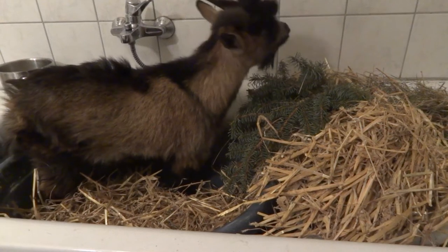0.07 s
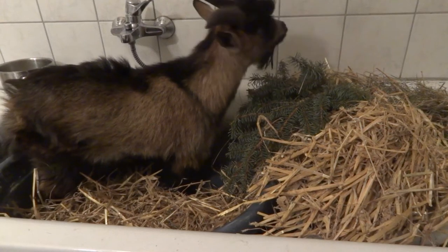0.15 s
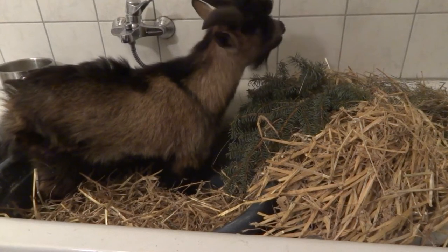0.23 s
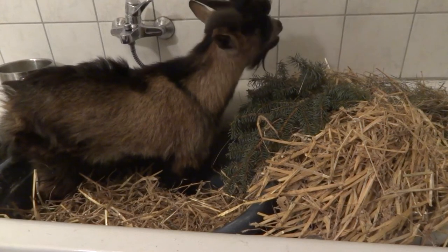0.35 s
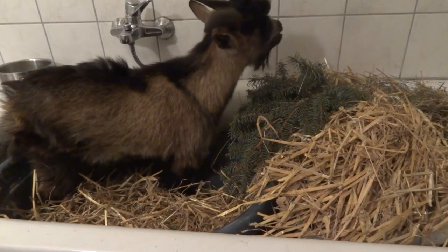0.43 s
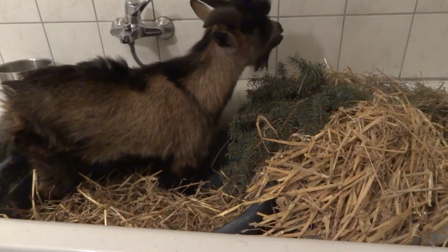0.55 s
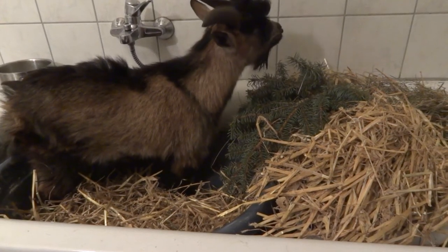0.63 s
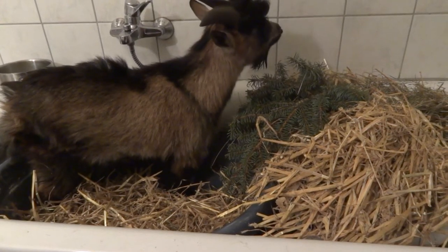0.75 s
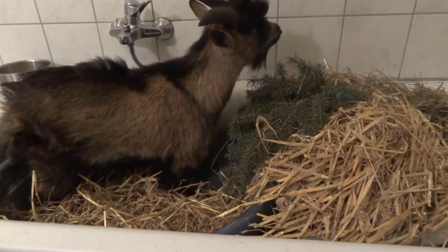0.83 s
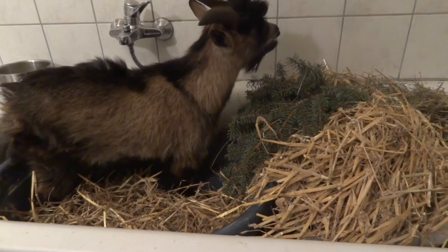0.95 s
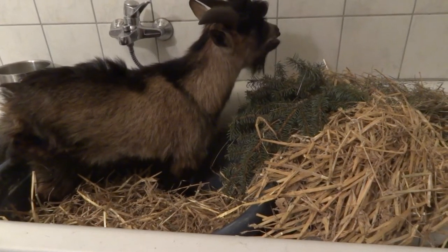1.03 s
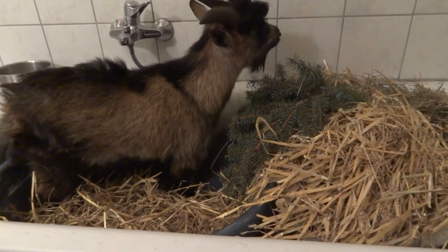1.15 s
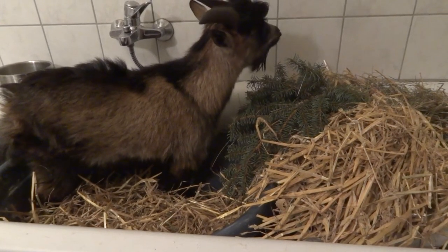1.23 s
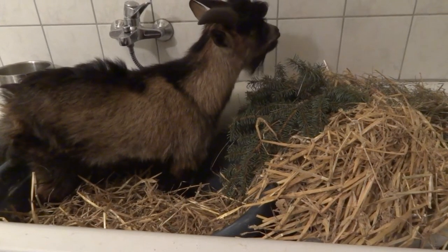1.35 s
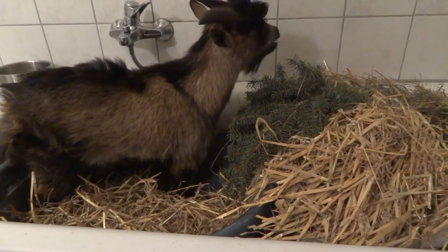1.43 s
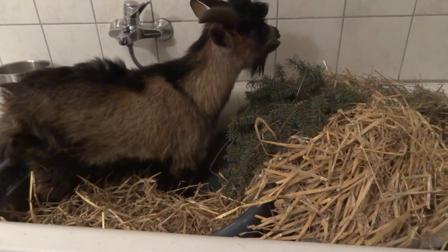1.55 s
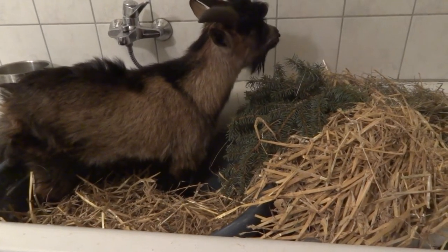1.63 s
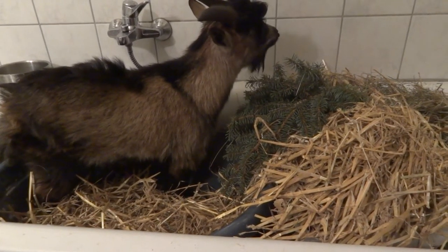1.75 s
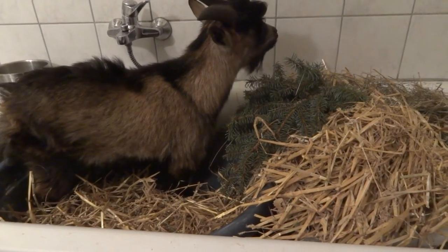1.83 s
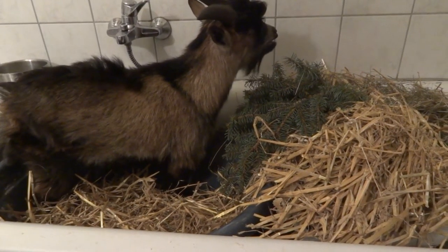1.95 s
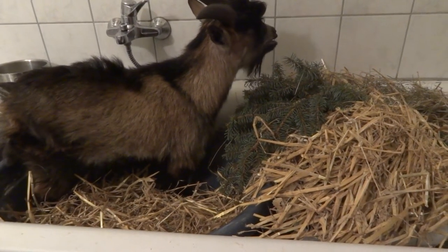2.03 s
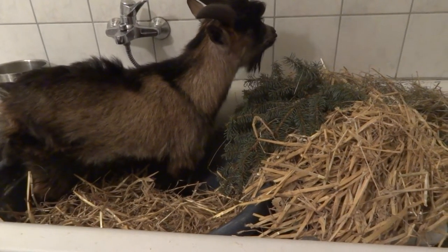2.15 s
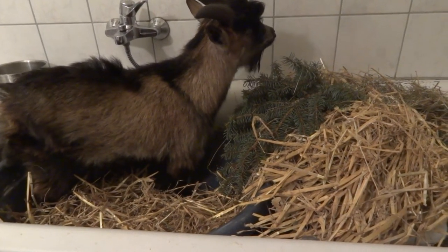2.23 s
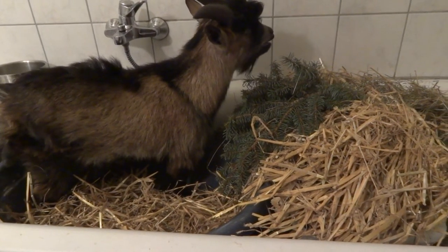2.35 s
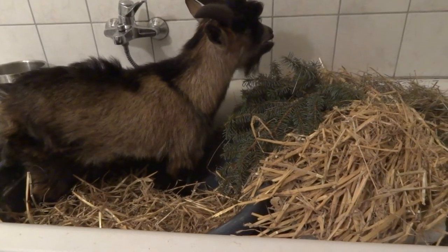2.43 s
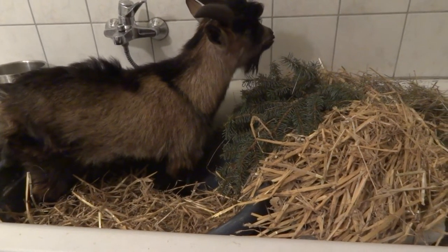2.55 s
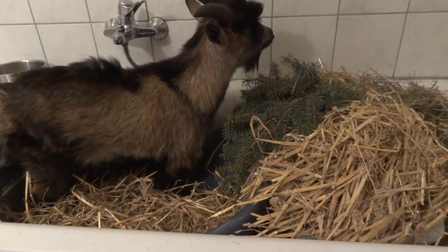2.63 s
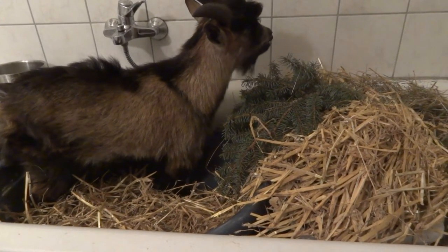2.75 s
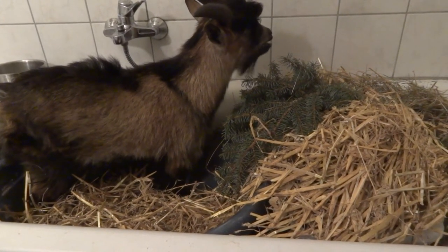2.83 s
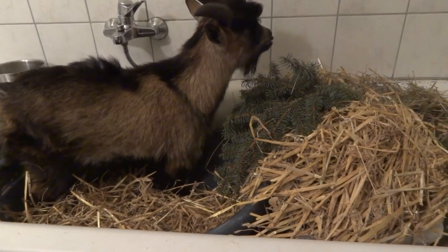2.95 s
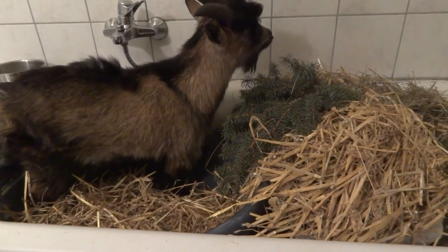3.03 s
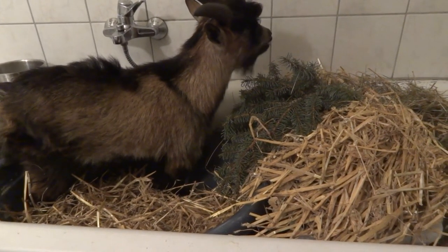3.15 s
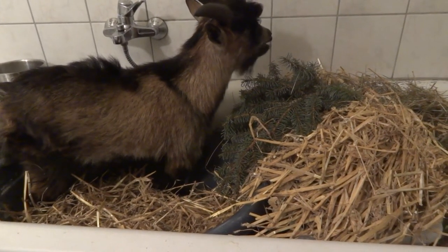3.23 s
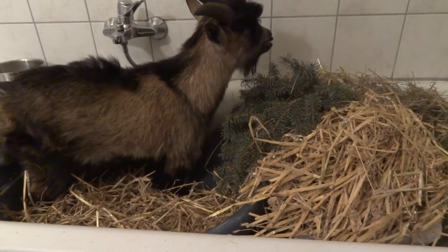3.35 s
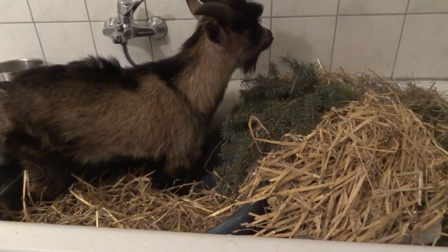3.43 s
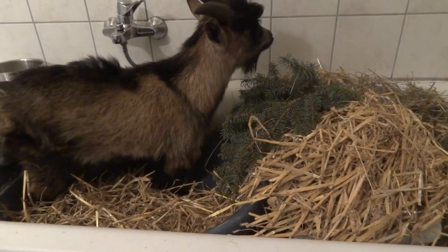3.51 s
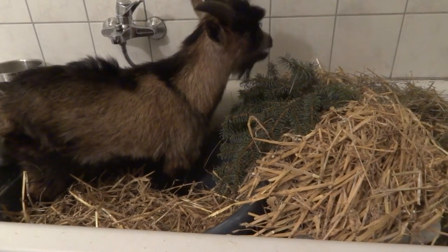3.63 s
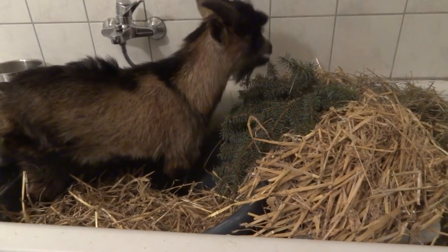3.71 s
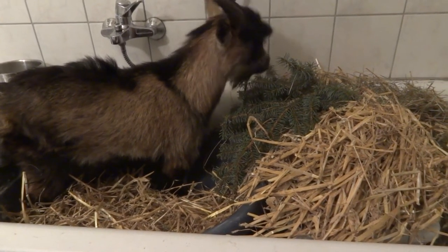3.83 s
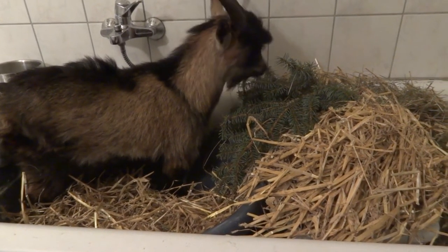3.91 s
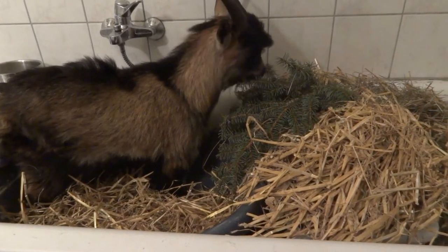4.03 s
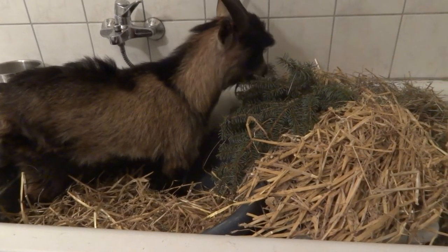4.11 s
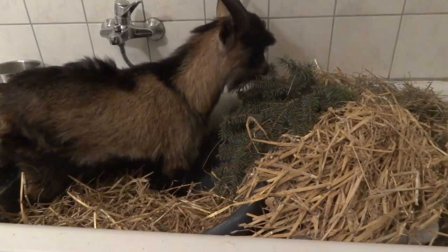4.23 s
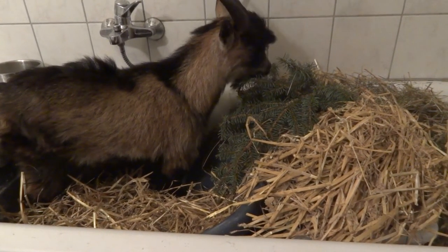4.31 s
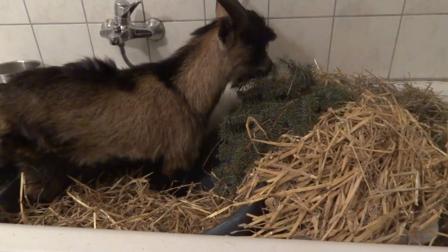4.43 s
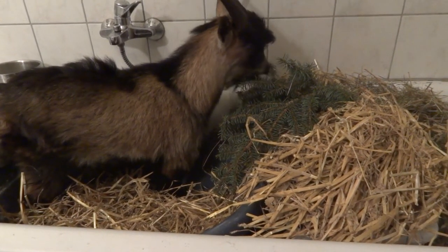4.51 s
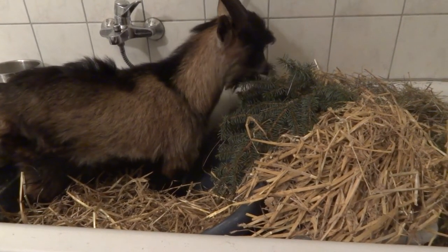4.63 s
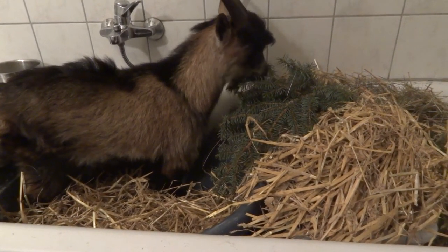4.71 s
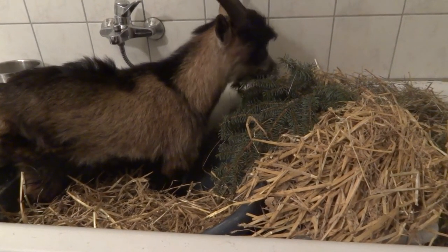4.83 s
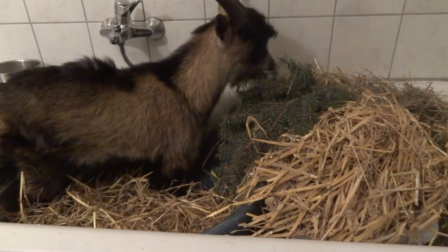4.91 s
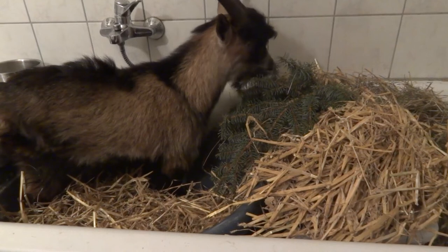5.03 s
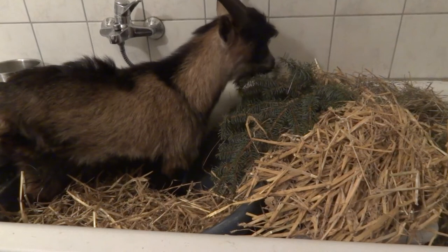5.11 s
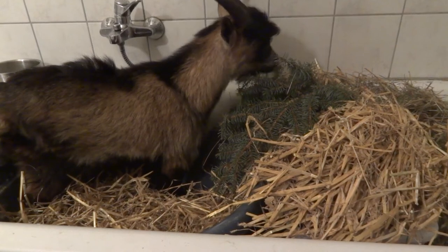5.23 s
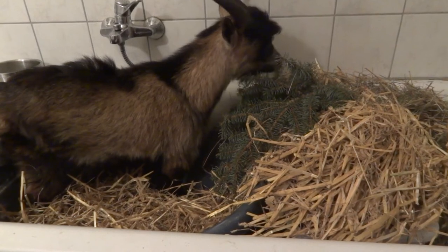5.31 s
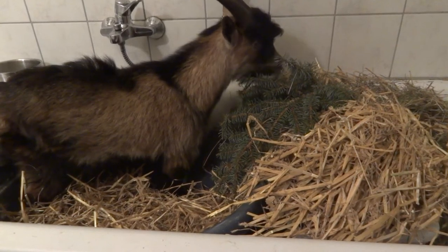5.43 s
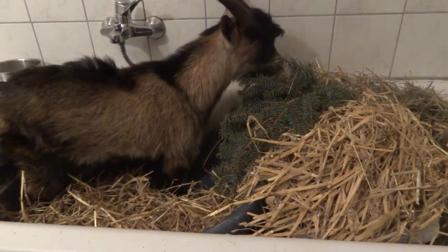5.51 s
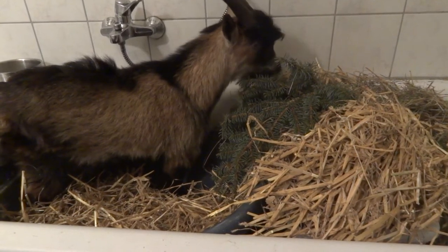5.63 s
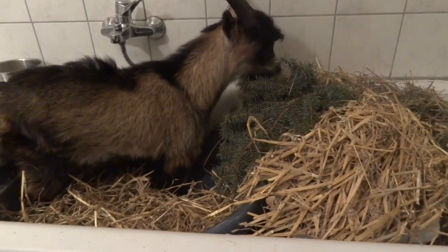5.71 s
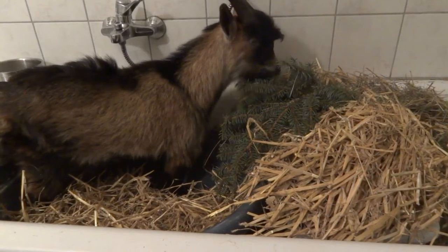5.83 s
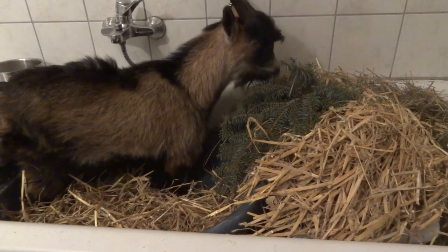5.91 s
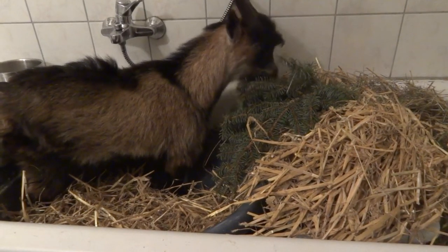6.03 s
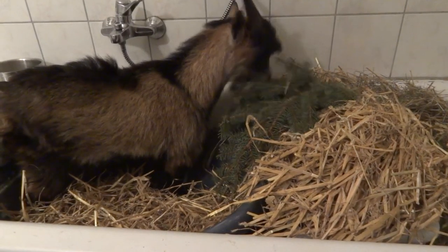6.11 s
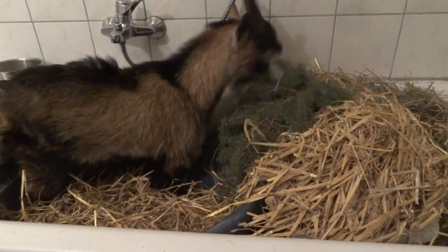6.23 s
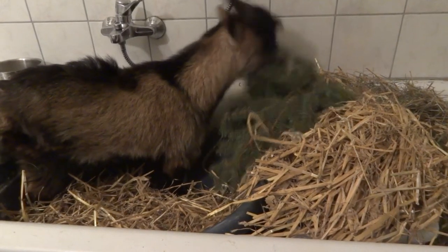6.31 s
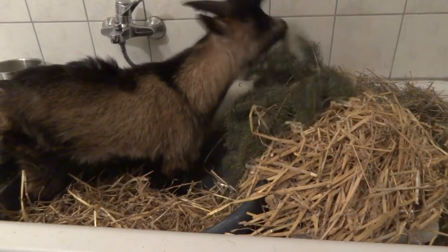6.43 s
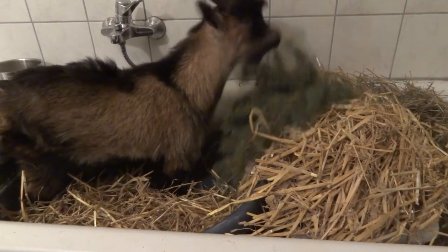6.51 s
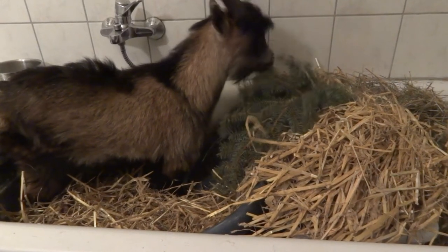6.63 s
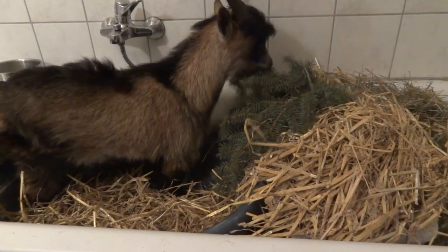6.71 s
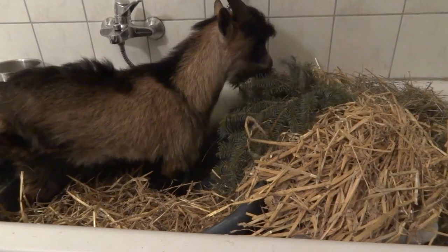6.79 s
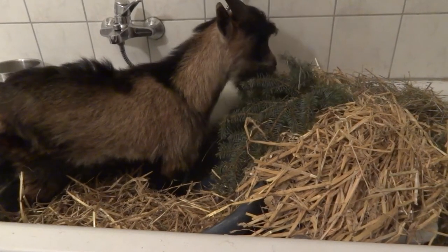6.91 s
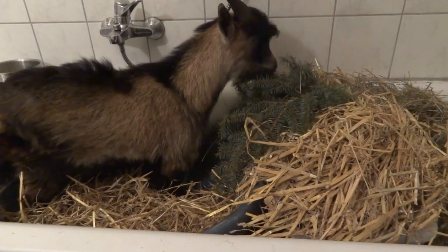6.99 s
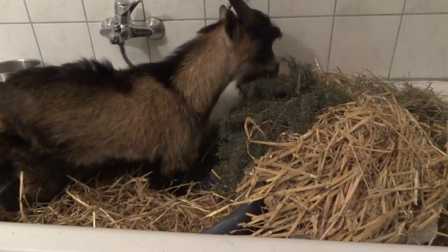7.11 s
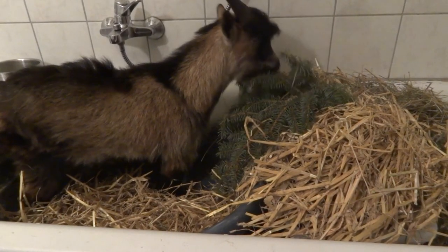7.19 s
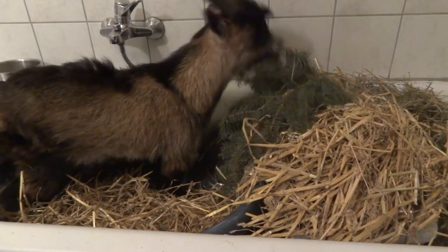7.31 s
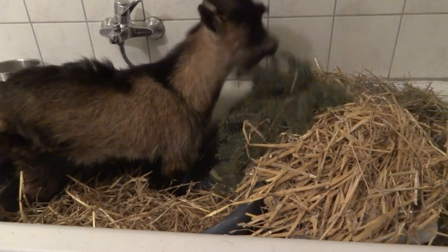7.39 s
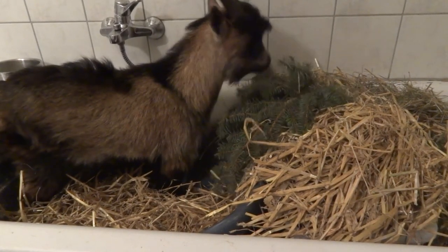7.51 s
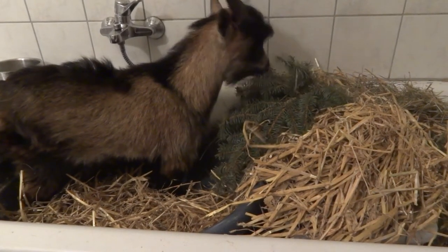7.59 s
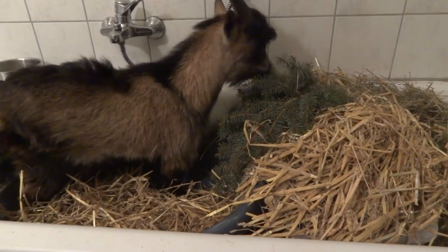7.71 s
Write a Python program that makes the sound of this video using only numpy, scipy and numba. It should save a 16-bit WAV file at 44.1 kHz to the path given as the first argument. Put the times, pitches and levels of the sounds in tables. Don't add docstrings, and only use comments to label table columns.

```python
import sys
import numpy as np
from scipy import signal
from scipy.fft import rfft, irfft, next_fast_len
from scipy.io import wavfile
from numba import njit

SR = 44100
rng = np.random.default_rng(int(sys.argv[2]) if len(sys.argv) > 2 else 0)


def volts(x):
    e = np.asarray(x, float) / 20
    return 10 ** e


def to_wav(sig):
    pcm = np.clip(np.atleast_2d(sig), -1, 1) * 32767
    pcm = np.round(pcm).astype(np.int16)
    wavfile.write(sys.argv[1], SR, pcm.T)


N = 341863
T = np.arange(N) / SR
STEPS = T[::64]
HZ = np.maximum(np.arange(N // 2 + 1) * SR / N, 1)


def unit(x):
    return x / np.sqrt(np.mean(x ** 2))


def over_hz(table):
    hz, value = np.transpose(table)
    return np.interp(np.log(HZ), np.log(np.maximum(hz, 1)), value)


def coloured(x, table):
    return unit(irfft(rfft(x) * volts(over_hz(table)), N))


@njit
def svf(x, hz, width):
    y, band, low = np.empty(len(x)), 0., 0.
    for i in range(len(x)):
        g = np.tan(np.pi * hz[i] / SR)
        damping = width / hz[i]
        v = (band + g * (x[i] - low)) / (1 + g * (g + damping))
        band = 2 * v - band
        low += 2 * g * v
        y[i] = damping * v
    return y


@njit
def rings(s, hz, cycles, size):
    y = np.zeros(N)
    for k in range(len(s)):
        turn = np.exp((2j * np.pi - 1 / cycles) * hz[k] / SR)
        i = int(s[k] * SR)
        z = size[k] * turn ** (i + 1 - s[k] * SR)
        soft, fade = 1., np.exp(-2 * hz[k] / SR)
        for j in range(max(i + 1, 0), min(N, i + 2 + int(6 * cycles * SR / hz[k]))):
            y[j] += z.imag * (1 - soft)
            z *= turn
            soft *= fade
    return y


def crackle(per_s, lo_hz, hi_hz, cycles, scatter_db, smooth):
    count = int(per_s) * 8
    s, pitch = rng.random((2, count))
    hz = lo_hz + pitch * (hi_hz - lo_hz)
    size = volts(scatter_db * np.minimum(rng.exponential(size=count), 4.5)) * np.sqrt(hz)
    grains = rings(s * N / SR, hz, cycles, size)
    smear = svf(rng.standard_normal(N), np.full(N, (lo_hz + hi_hz) / 2), 1. * (hi_hz - lo_hz))
    return unit(unit(grains) + smooth * unit(smear))


def flutter(per_s, spread_db):
    knots = rng.standard_normal(1000)
    return volts(spread_db * np.interp(T * per_s, np.arange(1000), knots))


def modes(x, table):
    total = 0
    for k, (hz, width_hz, db) in enumerate(table):
        total = total + (-1) ** k * volts(db) * svf(x, np.full(N, 1. * hz), 1. * width_hz)
    return unit(total)


def strokes(s, db, swell_s, die_s):
    late = STEPS - s[:, None]
    fall = np.maximum(late / np.abs(die_s)[:, None], -late / np.abs(swell_s)[:, None])
    return volts(db[:, None] - 20 * fall) + 1e-12


def together(gains, hz=None):
    power = np.sum(gains ** 2, axis=0)
    value = np.sqrt(power) if hz is None else np.sum(gains ** 2 * hz, axis=0) / power
    return np.interp(T, STEPS, value)


def latest(s, hz):
    return hz[np.maximum(np.searchsorted(s, T) - 1, 0)]


def burst(s, hz, db, spread, cycles, ms):
    step, detune, size = np.moveaxis(rng.random((len(s), 3, 8)), 1, 0)
    later = np.arange(8) > 0
    start = s[:, None] + ms / 1000 * step * later
    pitch = np.clip(hz[:, None] * np.exp(spread * (detune - .5) * later), 40, 10800)
    sizes = volts(db[:, None] - (5.3 * step + 18.2 * size) * later)
    return rings(start.ravel(), pitch.ravel(), cycles, sizes.ravel())


def crumble(s, db, ms):
    kicks = np.zeros(N)
    kicks[(s * SR).astype(int)] = volts(db)
    return signal.lfilter([1], [1, -np.exp(-1000 / ms / SR)], kicks)


# time of the peak in s, grinding in dB, mouth ring in dB, mouth resonance in Hz, die
# time in s.
BITES = [(0.2, -63.5, -57, 790, 0.062), (0.622, -59.5, -63.5, 900, 0.21), (1.17, -57.5, -60.5, 874, 0.13),
         (1.684, -50.5, -52, 840, 0.08), (2.128, -55.5, -56, 735, 0.084), (2.585, -57, -56, 630, 0.13),
         (2.985, -58.5, -56, 810, 0.094), (3.411, -57, -53.5, 676, 0.073), (3.87, -58.5, -62.5, 740, 0.084),
         (4.305, -55, -56, 910, 0.1)]
# time of the peak in s, grinding in dB, mouth ring in dB, resonance in
# Hz, die in s.
SLIDES = [(0.0, -66, -68, 900, 0.41), (0.3, -66.5, -78, 700, 0.17), (0.93, -72, -82, 800, 0.26),
          (1.046, -59.5, -65, 980, .04), (1.5, -62.5, -71, 820, 0.29), (1.6, -61, -55, 780, 0.09),
          (1.87, -68.5, -66, 730, 0.25), (2.03, -65, -64.5, 900, 0.24), (2.34, -61.5, -66.5, 640, 0.13),
          (2.502, -56, -55, 790, 0.13), (2.83, -73, -70, 970, 0.42), (3.17, -69, -66.5, 735, 0.17),
          (3.33, -64.5, -66.5, 760, 0.34), (3.63, -69.5, -75, 621, 0.14), (3.815, -59.5, -61.5, 690, .05),
          (4.06, -65, -67.5, 626, 0.13), (4.19, -68.5, -70, 830, 0.19), (4.54, -72, -78, 550, 0.2),
          (4.74, -73, -84, 647, .12), (5.085, -73.5, -84, 670, 0.088), (5.24, -67.5, -80, 670, 0.088)]
BITE_BUILD, SLIDE_BUILD = 1.3, 0.61
MOUTH_SAG_PER_S = 1.5


def chewing():
    s, grind_db, mouth_db, hz, die_s = np.transpose(BITES + SLIDES)
    swell_s = die_s * np.where(np.arange(len(s)) < len(BITES), BITE_BUILD, SLIDE_BUILD)
    grind = strokes(s, grind_db, swell_s, die_s)
    mouth = strokes(s, mouth_db, 0.68 * swell_s, 0.91 * die_s)
    closing_hz = hz[:, None] * np.exp(-MOUTH_SAG_PER_S * np.clip(STEPS - s[:, None], -.15, .15))
    return together(grind), together(mouth), together(mouth, closing_hz)


# centre in Hz, width in Hz, level in dB.
SHELL = [(420, 24, -0.5), (591, 48, 5.5), (697, 88, -7.5), (902, 54, 3.5), (990, 130, -1), (1118, 96, 4.5)]


def mouth_ring(x, hz):
    mouth = svf(svf(svf(x, hz, 660.0), hz, 620.0), hz, 520.0)
    return unit(modes(mouth, SHELL) + 0.5 * unit(mouth))


# centre in Hz, width in Hz, level in dB.
BONE = [(1600, 99, 1.5), (2290, 920, -5.5), (3370, 170, -1), (3990, 510, -5.5), (4970, 290, -2.5),
        (5600, 330, 0)]
# time in s, crisp top in dB re grinding, gap between the teeth in Hz.
MOUTHFUL = [(0.1, 2.5, 4500), (0.6, 1, 4750), (1.15, -1.5, 4900), (1.47, 1.5, 3640), (1.62, -1.5, 3420),
            (1.72, -7, 5300), (1.9, -0.5, 3480), (2.1, -1.5, 4650), (2.32, 2, 3220), (2.41, 0.5, 4300),
            (2.65, -4, 4250), (2.98, -1, 3850), (3.2, -2, 4120), (3.31, -2, 3620), (3.4, -0.5, 4400),
            (3.85, -5.5, 3800), (4.1, -14, 3870), (4.3, -4, 4400), (4.55, -4.5, 5200), (5.2, -0.5, 4700)]


def jaw():
    grind_gain, mouth_gain, mouth_hz = chewing()
    s, crisp_db, gap_hz = np.transpose(MOUTHFUL)
    press = flutter(per_s=95, spread_db=2.5)
    fractures = crackle(900, 1170, 5400, cycles=0.69, scatter_db=3.0, smooth=1.0)
    through_gap = svf(fractures, np.interp(T, s, gap_hz), 650.0)
    grind = modes(fractures + 2.1 * through_gap, BONE)
    crisp = crackle(900, 6400, 9250, cycles=1.4, scatter_db=3.5, smooth=0.75)
    crisp = volts(np.interp(T, s, crisp_db)) * crisp
    low = crackle(600, 340, 1323, cycles=0.96, scatter_db=2.0, smooth=1.0)
    mouth = volts(-3.5) * mouth_gain * mouth_ring(low, mouth_hz)
    return press * (volts(-2.5) * grind_gain * (grind + crisp) + mouth)


# time in ms, ring in Hz, decay in cycles, peak in dB, likeness of the ports.
MOTOR = [(18.0, 5310, 11, -64.5, 0.38), (17.8, 4430, 3.1, -62, 0.35), (22.11, 1070, 1.16, -58, -0.39),
         (23.43, 640, 0.42, -56.5, -0.47), (35.3, 4400, 2.4, -82, .5), (37.9, 5300, 11.6, -67, 0.26),
         (38, 4150, 5, -69.5, 0.46), (39, 2036, 6.2, -70.5, 0.079)]
# time in s, level in dB.
MOTOR_LOAD = [(0, 3.5), (4, 2.2), (5.7, -1), (6.8, 7), (7.75, 7)]
TURN_S = .04


def motor():
    turns = np.arange(0, N / SR, TURN_S)
    out = 0
    for ms, hz, cycles, db, alike in MOTOR:
        size, detune, late = rng.standard_normal((3, len(turns)))
        strength = volts(db + 2.7 * size)
        start = turns + (ms + .25 * late) / 1000
        tick = rings(start, hz * (1 + .007 * detune), 1. * cycles, strength)
        quarter = np.imag(signal.hilbert(tick, next_fast_len(N))[:N])
        out = out + tick + np.sqrt((1 - alike) / (1 + alike)) * quarter * np.array([[1], [-1]])
    return out * volts(np.interp(T, *np.transpose(MOTOR_LOAD)))


# frequency in Hz, level in dB.
HISS = [(18, -36), (27, -19), (40, -5), (54, -9.5), (139, -12.5), (182, -10), (346, -11.5), (782, -8),
        (864, -12.5), (1250, -10.5), (2150, -16.5), (5240, -21.5), (11000, -29), (14300, -73),
        (22000, -120)]
# frequency in Hz, likeness from -1 to 1.
HISS_ALIKE = [(60, 0.96), (130, 0.75), (270, 0.33), (560, -0.43), (1190, -0.29), (2520, -0.098),
              (5310, 0.49), (11200, 0.76)]
HISS_DB = -71.5


def camera():
    alike = np.clip(over_hz(HISS_ALIKE), -.98, .98)
    whirr_band = np.exp(-(np.log(HZ / 1300) / 1.05) ** 2)
    load = volts(-2.5 * np.sin(2 * np.pi * (T / TURN_S - .05)))
    noise = rng.standard_normal((2, N)) * flutter(per_s=23, spread_db=0.96)
    spectra = rfft(noise) * (1 - whirr_band) + rfft(noise * load) * whirr_band
    mid, side = spectra * volts(over_hz(HISS))
    mid, side = mid * np.sqrt(1 + alike), side * np.sqrt(1 - alike)
    scale = volts(HISS_DB + 1.54) / np.sqrt(np.mean(irfft(mid, N) ** 2))
    return irfft(np.array([mid + side, mid - side]), N) * scale + motor()


# start in s, ring in dB, ring in Hz, crisp top in dB re ring.
CRACKS = [(0.137, -57, 4800, -1.5), (0.418, -67, 4880, -11), (0.4617, -52.5, 4600, -5),
          (0.4776, -52, 5430, -6), (0.4917, -52.5, 6100, -1), (0.5405, -54, 5130, 1.5),
          (0.5455, -59, 5400, -8), (0.5746, -70, 2600, 6), (0.591, -38.5, 5900, -4),
          (0.6217, -52, 4800, -3), (0.6762, -50.5, 5600, 1.5), (0.7352, -57, 5620, -6),
          (0.9303, -66, 4030, 5), (1.042, -51, 5940, -4), (1.1272, -49, 5300, -4.5), (1.1301, -57, 3100, 0),
          (1.1563, -44, 5500, 1), (1.166, -74, 5960, 14), (1.193, -46, 5400, -9.5), (1.4155, -62, 4270, -8),
          (1.4724, -66, 6000, 7), (1.4914, -61, 3450, -7), (1.5463, -54, 4200, 0),
          (1.5969, -43.5, 5120, -2.5), (1.6432, -51, 5400, -1), (2.0493, -57, 6010, 3),
          (2.1017, -46, 5300, -1.5), (2.4164, -59, 4260, -5), (2.4743, -48, 5960, -14),
          (2.7172, -61.5, 2680, -2), (2.875, -64, 3960, 0), (2.956, -62, 3370, 0), (3.275, -64.5, 4050, 6),
          (3.3713, -55, 4520, -1.5), (3.429, -57.5, 5500, 3)]
# start in s, ring in dB, crisp top in dB re ring, mouth knock in dB re ring.
TEETH = [(1.6656, -47.5, 6, 10), (2.5667, -44, -11, 1), (2.8042, -65, -2, 11), (2.9757, -51, -9, -6),
         (3.4111, -60, -2, -6), (3.875, -54, -16, -2.5), (4.2462, -56, 0.5, -0.5), (4.2957, -46, -5, -4)]
# start in s, ring in dB, ring in Hz, mouth knock in dB re ring.
SMACKS = [(1.8614, -57, 3000, 1), (2.0034, -52.5, 3840, -19), (2.3027, -53, 3240, -3),
          (3.1607, -61, 3210, -10), (3.1727, -57, 4070, -5), (3.2962, -55, 3740, -11),
          (3.3403, -56, 3700, 4), (3.6182, -54, 3450, -18), (3.7928, -63, 4450, -8),
          (3.8046, -47.5, 3840, -7), (3.83, -57, 3730, -10), (4.0572, -51.5, 3700, -20),
          (4.1729, -59, 3710, -15), (4.7268, -56, 3300, -17), (5.08, -61, 4400, -16),
          (5.233, -56.5, 4100, -16)]
# start in s, ring in dB, ring in Hz, crisp top in dB re ring.
TWIGS = [(4.868, -79, 1840, 19), (4.8814, -79, 1630, 24.5), (5.75, -59, 4830, 2), (5.7826, -63, 6000, 1),
         (5.8045, -50, 1140, -17), (5.8268, -53.5, 2450, 5.5), (5.875, -53, 5260, -1),
         (6.1315, -51, 5450, 7), (6.4008, -32.5, 5670, 4.5), (6.457, -50, 4630, 16), (6.425, -46, 5540, 1),
         (6.5268, -52, 4800, 5), (6.551, -47, 6000, 7), (6.566, -43, 6000, 8), (6.829, -51.5, 4800, -3),
         (6.9323, -66.5, 6000, 5.5), (7.178, -62, 6080, 1), (7.2343, -48, 4700, -4), (7.27, -52, 6000, 4),
         (7.2787, -46, 5100, 3.5), (7.307, -37.5, 5000, 0), (7.3114, -30, 5530, -1.5),
         (7.3233, -33, 6200, 1), (7.462, -43.5, 3580, -2), (7.474, -48, 2830, -5), (7.5761, -53.5, 6000, 3)]
CRACK_KNOCK_DB, CRACK_FOLLOWS_JAW = 5, 0.95
TOOTH_HZ, SMACK_CRISP_DB, TWIG_KNOCK_DB = 1630, -17.5, -24


def breaks(mouth_gain):
    def pressed_db(s, db):
        jaw_db = 20 * np.log10(np.interp(s, T, mouth_gain))
        return CRACK_KNOCK_DB + CRACK_FOLLOWS_JAW * (jaw_db - db + 8.0) - 4.5

    rows = [(s, db, hz, crisp, pressed_db(s, db)) for s, db, hz, crisp in CRACKS]
    rows += [(s, db, TOOTH_HZ, crisp, knock) for s, db, crisp, knock in TEETH]
    rows += [(s, db, hz, SMACK_CRISP_DB, knock) for s, db, hz, knock in SMACKS]
    rows += [(s, db, hz, crisp, TWIG_KNOCK_DB) for s, db, hz, crisp in TWIGS]
    return np.transpose(sorted(rows))


TILE_ECHO_S, TILE_ECHO_DB = .0037, 1.5
RING_SHADOW = .45


def snaps():
    _, mouth_gain, mouth_hz = chewing()
    s, ring_db, hz, crisp_db, knock_db = breaks(mouth_gain)
    knock_db = ring_db + knock_db
    ring = burst(s, hz, ring_db, spread=0.36, cycles=3.8, ms=2.026)
    crisp_hz = np.full(len(s), 8700.)
    crisp = burst(s, crisp_hz, ring_db + crisp_db + 10.0, spread=0.37, cycles=3.43, ms=1.8)
    knock = burst(s, np.interp(s, T, mouth_hz), knock_db + 2.0, spread=0.42, cycles=1.3, ms=4.96)
    knock = svf(knock, mouth_hz, 740.0)
    crack = burst(s, np.sqrt(4500 * hz), ring_db + 4, spread=1.0, cycles=1.6, ms=1.5)
    sharp = crack + ring + crisp
    echo = volts(TILE_ECHO_DB) * np.roll(sharp - RING_SHADOW * ring, int(TILE_ECHO_S * SR))
    grit = crackle(1500, 455, 7700, cycles=0.93, scatter_db=3.0, smooth=0.73)
    last_hz = latest(s, hz)
    wet = unit(svf(svf(grit, last_hz, 1400.0), last_hz, 640.0)) * crumble(s, ring_db - 12.5, ms=24.4)
    mouth = mouth_ring(grit, mouth_hz) * crumble(s, knock_db - 8.5, ms=32.7)
    return sharp + echo + knock + wet + mouth


# start in s, peak in dB, ring in Hz.
KNOCKS = [(0.179, -63, 996), (0.195, -59, 975), (0.21, -57, 230), (0.24, -59, 220), (0.575, -55, 945),
          (0.604, -51, 920), (0.813, -72, 303), (1.042, -60, 912), (1.1, -58, 902), (1.128, -51, 900),
          (1.156, -47, 732), (1.158, -50, 1600), (1.979, -63, 1080), (2.081, -56, 900), (2.104, -58, 705),
          (2.576, -55, 486), (2.629, -57, 584), (2.964, -54, 931), (3.804, -57, 767), (3.875, -54, 1120),
          (3.89, -59, 440), (4.266, -54.5, 543), (4.296, -53, 1060), (4.301, -63, 165), (4.306, -51.5, 432),
          (4.328, -51.5, 305), (4.34, -53.5, 443), (4.38, -61, 310), (4.42, -66, 310), (5.805, -58, 1166),
          (6.138, -49, 990), (5.83, -74, 111), (6.149, -57, 215), (6.18, -54, 438), (6.225, -55, 440),
          (6.38, -51, 1320), (6.43, -61, 100), (6.442, -50, 260), (6.48, -53, 300), (6.528, -41, 995),
          (6.545, -45, 800), (6.54, -48.5, 440), (6.6, -52, 442), (6.652, -55, 550), (6.67, -66, 69),
          (7.301, -54, 1270), (7.323, -57, 320), (7.339, -48.5, 710), (7.579, -60, 1140)]


def knocks():
    s, db, hz = np.transpose(KNOCKS)
    return burst(s, hz, db, spread=0.18, cycles=5.1, ms=9.05)


# centre in Hz, width in Hz, level in dB.
DRUM = [(74, 27, -7), (122, 39, 3.5), (175, 25.6, 4), (230, 27, -1.5), (301, 28, -1), (438.5, 50, 3.5)]
# time of the peak in s, drumming in dB, pitch of the push in Hz,
# die time in s.
SHIFTS = [(0.228, -61.5, 201, 0.13), (0.59, -66.5, 345, 0.11), (0.69, -68, 290, 0.37),
          (2.61, -68, 445, 0.21), (3.02, -62.5, 440, 0.12), (3.924, -65, 433, 0.064),
          (4.33, -51.5, 350, 0.081), (5.828, -71, 284, 0.33), (6.159, -53, 230, 0.16),
          (6.21, -61, 400, 0.12), (6.438, -50.5, 263, 0.15), (6.576, -49, 262, 0.12),
          (7.332, -53, 275, 0.2), (7.438, -61, 272, 0.27), (7.638, -67.5, 301, .12)]
# start in s, peak in dB, pitch of the push in Hz.
THUMPS = [
    (0.19, -58, 112),
    (4.302, -60, 326),
    (6.128, -52, 300),
    (6.41, -46, 280),
    (6.527, -46, 380),
    (7.32, -50, 320),
]
SHIFT_BUILD = 0.45


def tub():
    pushes = crackle(150, 61, 590, cycles=0.39, scatter_db=2.5, smooth=0.6)
    s, db, hz, die_s = np.transpose(SHIFTS)
    weight = strokes(s, db - 3.0, SHIFT_BUILD * die_s, die_s)
    push_hz = together(weight, hz[:, None])
    leaning = svf(svf(svf(pushes, push_hz, 264.0), push_hz, 264.0), push_hz, 223.0)
    slow = together(weight) * modes(leaning, DRUM)
    s, peak_db, hz = np.transpose(THUMPS)
    last_hz = latest(s, hz)
    floor = rings(s, hz / 5, 1.5, volts(peak_db - 14))
    shoves = modes(svf(svf(pushes, last_hz, 330.), last_hz, 330.), DRUM)
    return floor + slow + shoves * crumble(s, peak_db - 9.5, ms=57.0)


# frequency in Hz, level in dB.
NEEDLES = [(760, -33), (1300, -15), (2240, -11), (5430, -3.5), (6280, -6), (8380, -1), (9960, -3),
           (11300, -6.5), (14700, -38), (22000, -120)]
# time of the peak in s, needle hiss in dB, swell in s, die in s, branch scrape in
# dB re hiss.
PULLS = [(5.81, -56, 0.078, 0.16, -7.5), (5.88, -63.5, 0.16, 0.092, -9), (6.157, -44, 0.08, .15, -6.5),
         (6.349, -32.5, 0.11, 0.14, -35), (6.42, -36.5, 0.18, 0.12, -15), (6.534, -38.5, 0.049, 0.14, -5.5),
         (6.57, -36, 0.55, 0.14, -21), (6.83, -61.5, 0.57, 0.33, -12), (7.28, -46.5, 0.15, 0.15, -11),
         (7.319, -39, 0.049, 0.071, -14), (7.39, -38, 0.09, 0.2, -17.5), (7.46, -39, 0.2, 0.098, -22),
         (7.57, -58, .12, 0.13, -4.5), (7.72, -81.5, 0.11, 0.23, 14)]
TWIG_SHARE_DB, TWIG_LAG_S, TWIG_SWELL, TWIG_DIE = -9.5, 0.0059, 0.77, 1
BARK_CATCH, BARK_DRAG = 0.54, 0.82


def branches():
    s, hiss_db, swell_s, die_s, scrape_db = np.transpose(PULLS)
    needles = coloured(crackle(5000, 3970, 10040, cycles=0.52, scatter_db=2.5, smooth=0.99), NEEDLES)
    twigs = coloured(crackle(2000, 1060, 3700, cycles=0.92, scatter_db=1.0, smooth=1.0), NEEDLES)
    scrape = crackle(500, 523, 1193, cycles=2.3, scatter_db=2.5, smooth=0.61)
    soft = strokes(s, hiss_db - 2.5, swell_s, die_s)
    stiff = strokes(s + TWIG_LAG_S, hiss_db + TWIG_SHARE_DB - 2.0, TWIG_SWELL * swell_s, TWIG_DIE * die_s)
    bark = strokes(s, hiss_db + scrape_db - 2.5, BARK_CATCH * swell_s, BARK_DRAG * die_s)
    brushing = together(soft) * needles + together(stiff) * twigs
    return brushing * flutter(per_s=60, spread_db=2.0) + together(bark) * scrape


ROOM_T60_S, ROOM_TOP_T60_S, ROOM_DB = 0.4, 0.18, -7


def room(x):
    t = T[:SR]
    noise = rng.standard_normal((2, SR))
    low = signal.sosfilt(signal.butter(2, 2500, fs=SR, output="sos"), noise)
    tail = low * volts(-60 * t / ROOM_T60_S) + (noise - low) * volts(-60 * t / ROOM_TOP_T60_S)
    tail = tail * (t > .003)
    tail = tail[0] * np.sqrt(.4) + tail * np.sqrt(.6)
    tail = tail / np.sqrt(np.sum(tail ** 2) / 2)
    return signal.fftconvolve(x[None], tail, axes=1)[:, :N]


# frequency in Hz, left minus right in dB.
PORT_DB = [(100, -1), (600, -0.7), (1100, -3.5), (2000, -3), (6300, -3.5), (11000, -3)]
# frequency in Hz, left lead in rad.
PORT_RAD = [(60, 0.39), (600, -0.55), (1700, -0.75), (2300, -0.44), (5900, -0.6), (11000, -0.88)]


def scene():
    near = jaw() + snaps() + knocks() + tub() + branches()
    tilt = volts(over_hz(PORT_DB) / 2) * np.exp(.5j * over_hz(PORT_RAD))
    heard = rfft(near + volts(ROOM_DB) * room(near)) * np.array([tilt, 1 / tilt])
    return irfft(heard, N) + camera()


def top_cut(x):
    return signal.sosfilt(signal.butter(12, 11820, fs=SR, output="sos"), x)


def record(dry):
    low_pass = signal.ellip(12, .2, 80, 11050, fs=SR, output="sos")
    return top_cut(signal.sosfilt(low_pass, dry))


dry = scene()
out = record(dry)
to_wav(out)
```